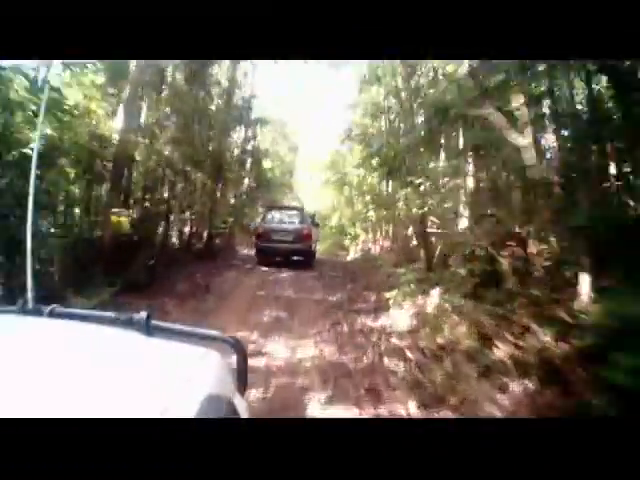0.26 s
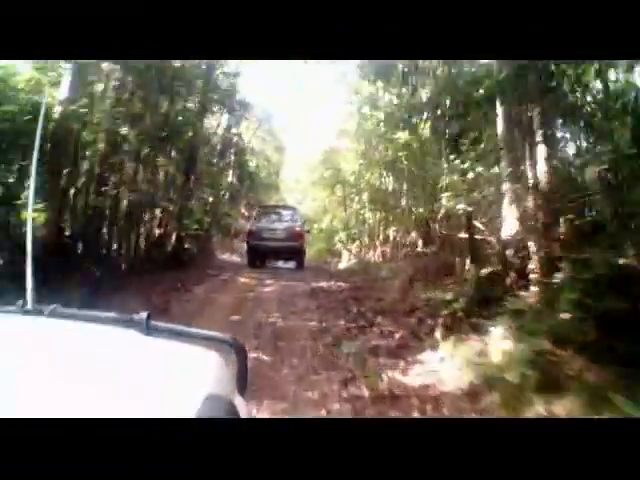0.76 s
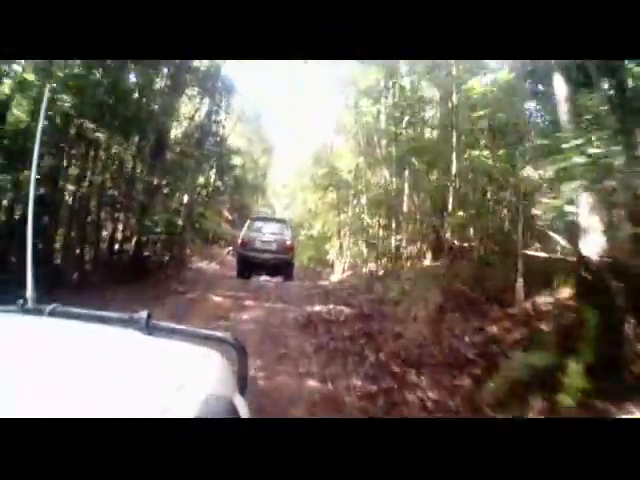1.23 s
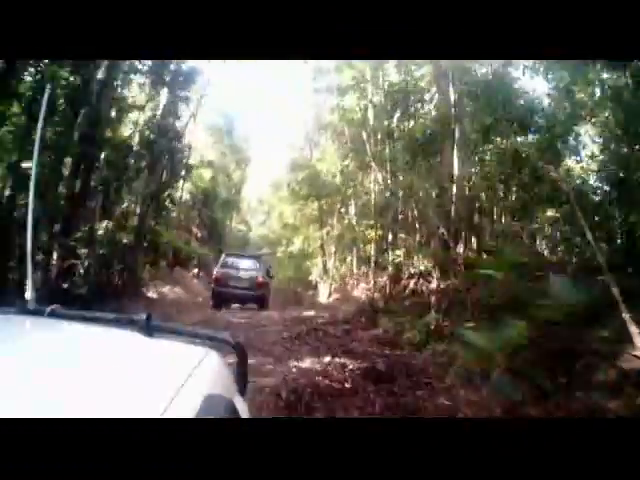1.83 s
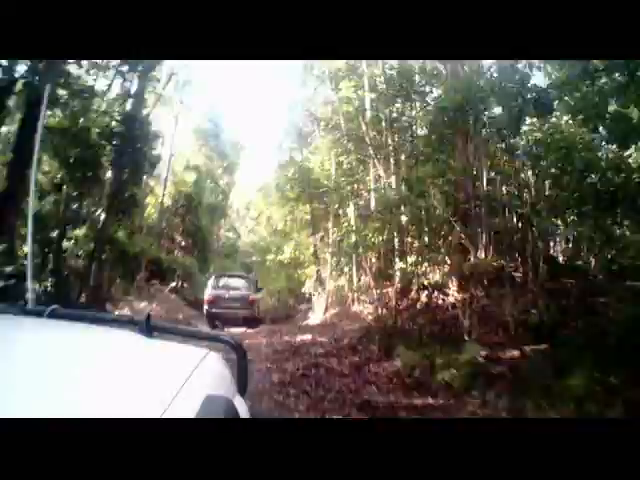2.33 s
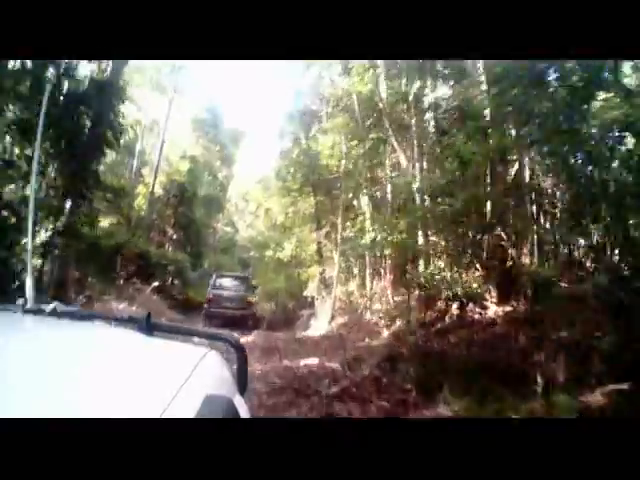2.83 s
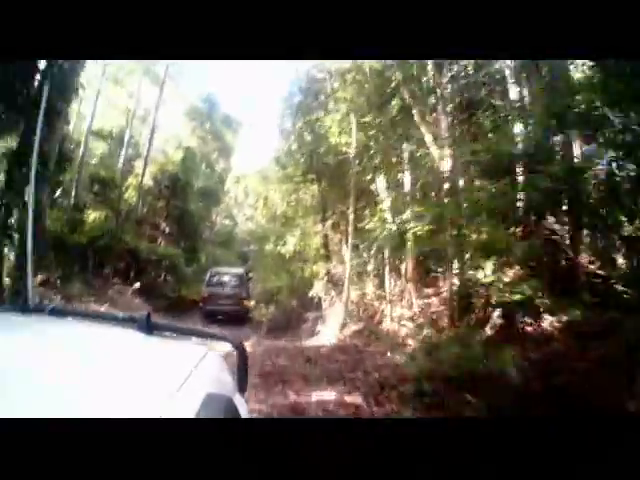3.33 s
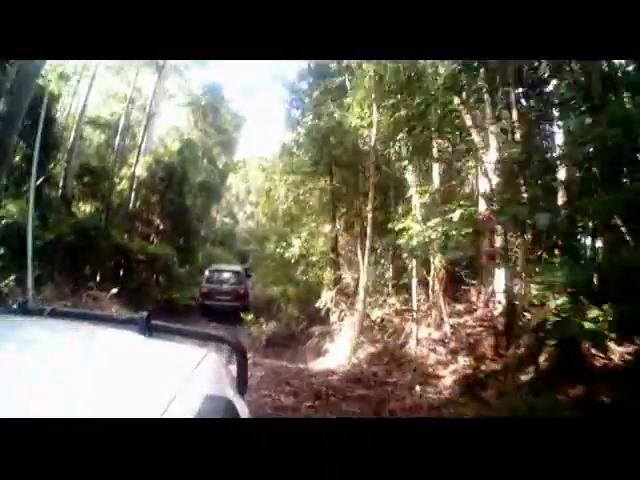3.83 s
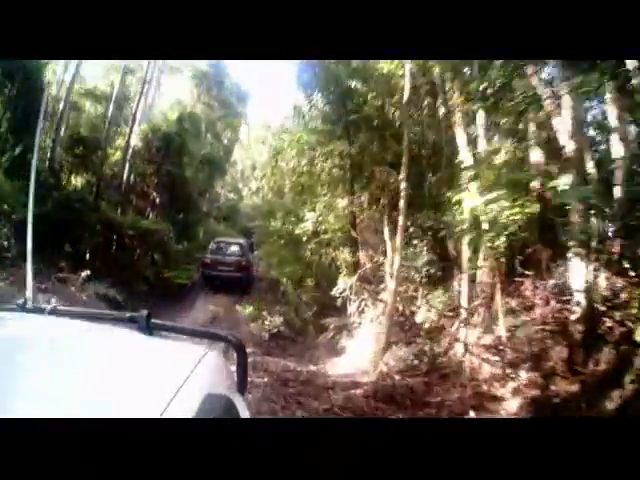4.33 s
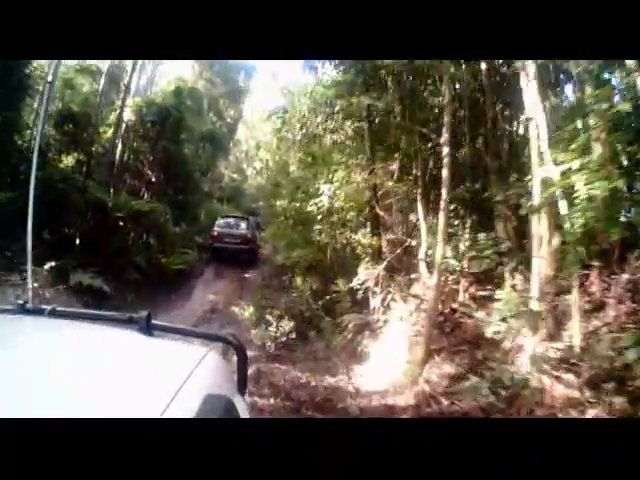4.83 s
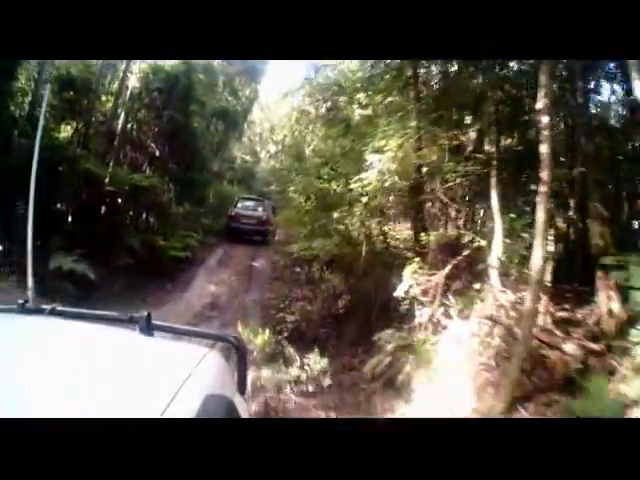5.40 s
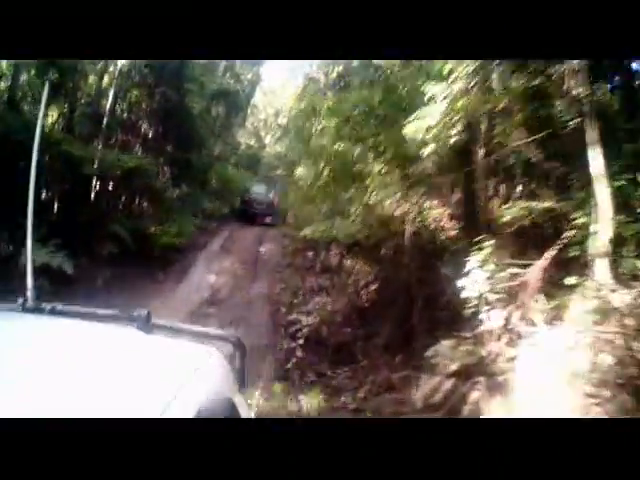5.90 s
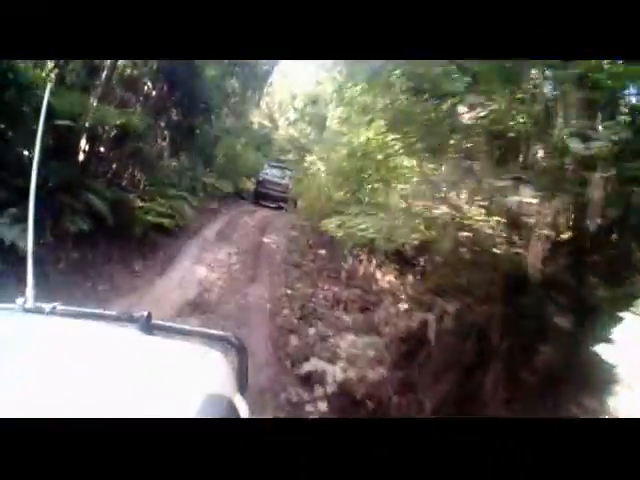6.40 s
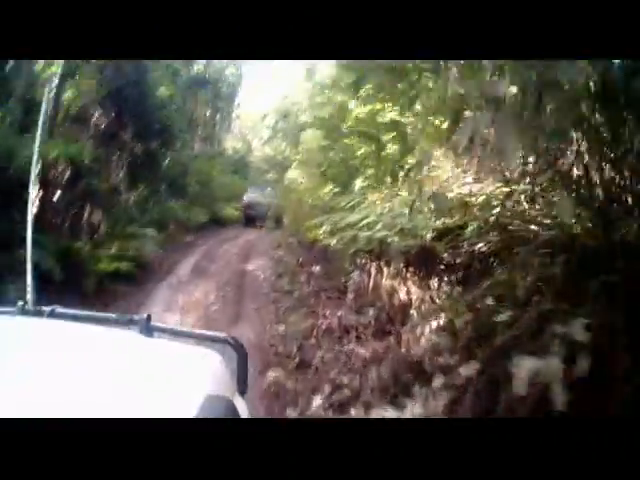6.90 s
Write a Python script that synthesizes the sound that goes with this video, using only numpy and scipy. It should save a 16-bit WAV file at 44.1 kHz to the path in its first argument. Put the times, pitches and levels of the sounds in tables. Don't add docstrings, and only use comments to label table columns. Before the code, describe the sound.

Everything is close and boxy, carried through the mount of a small camera on a four-wheel drive. A deep, uneven rumble lurches over ruts throughout, strongest at the start, beneath a gritty midrange buzz that throbs with the engine. The engine drone falls in pitch from 0 to about 2.3 s, stays low with small changes, eases off in strength around 4.2 to 5 s, then pulls harder and climbs from 5.3 to 6.3 s, with a faint gear whine near 5.9. Tiny twig snaps come at 2.8 s; stones and twigs knock in a cluster from 3.5 to 3.8 and again from 4.1 to 4.6. At 5.16 to 5.23 a hard, brittle double jolt rattles and rings briefly. Single knocks follow, one at 6.2. From 6.65 to the end near 7.15, about nine evenly spaced ratchet clacks thud. Dull tyre hiss, fine injector fizz and faint steady electronic ticking lie behind.

```python
import sys
import numpy as np
from scipy import signal
from scipy.fft import rfft, irfft, next_fast_len
from scipy.io import wavfile
from scipy.ndimage import uniform_filter1d, map_coordinates

SR = 44100
rng = np.random.default_rng(int(sys.argv[2]) if len(sys.argv) > 2 else 0)


def amplitude_ratio(level_db):
    exponent = np.asarray(level_db, float) / 20
    return 10 ** exponent


def transcribe(signal):
    frames = np.atleast_2d(signal).T
    limited = np.clip(frames, -1, 1)
    pcm = np.round(limited * 32767).astype(np.int16)
    wavfile.write(sys.argv[1], SR, pcm)


N = 315315

# t/s, level/dB
ROUGHNESS = [(0, -33.5), (1, -39.5), (1.9, -42.5), (2.3, -39), (4.5, -40), (5.4, -42.5), (5.7, -46.5),
             (6.55, -45), (6.85, -35.5), (7.15, -38)]
# t/s, level/dB
RUTS = [(.02, -25.5), (.21, -30), (.49, -31), (.73, -29.5), (1.19, -33), (1.45, -36), (1.76, -34.5),
        (2.08, -28.5), (2.23, -31), (2.4, -34), (2.84, -30.5), (3.05, -32), (3.25, -34.5), (3.76, -32),
        (4.05, -33), (4.24, -34), (4.57, -33), (5.29, -34), (5.5, -39.5), (6.7, -35.5), (7.02, -27)]
# t/s, level/dB
LITTER = [(0.0, -58.5), (0.3, -59), (1.29, -60.5), (1.59, -62), (2.61, -63), (4.02, -59.5), (4.26, -58),
          (5.12, -58.5), (5.28, -57.5), (5.81, -58.5), (6.07, -56), (6.39, -57.5), (6.69, -56.5),
          (6.87, -57.5), (7.15, -57)]

# f/Hz, width/Hz, level/dB
SWAY = [(33.8, 9.2, 13.5), (17, 6.7, -19.5), (48, 6.5, -25), (70, 37, -37.5)]
# f/Hz, width/Hz, level/dB
FRAME = [(117.8, 14, -1.5), (137.7, 27, -1.1), (176.7, 27, 1), (206.7, 23, -1.5)]
# f/Hz, width/Hz, level/dB
CLAMP = [(243, 7, 0)]
# f/Hz, width/Hz, level/dB
HOUSING = [(1053.6, 120, -2.5), (1111, 83, 1), (1159, 33, -6.5)]
# f/Hz, width/Hz, level/dB
PANELS = [(304.3, 67, -0.5), (335, 130, -6.5), (416.4, 58, -2), (474, 70, -0.5), (624, 250, -10),
          (791, 82, -3), (891, 110, -2.5)]
# f/Hz, width/Hz, level/dB
CAVITY = [(2712, 280, -3), (4090, 440, -11)]
# f/Hz, width/Hz, level/dB
PAWL = [(419, 360, -1.5), (695, 550, -5), (1130, 290, -2.5), (3860, 580, -4), (1503, 380, 3),
        (2750, 480, -4)]
# f/Hz, width/Hz, level/dB
MOUNT = [(75.6, 14, -53.5), (118, 32, -40.5), (136.7, 16, -37), (179.4, 6.5, -35.5), (239.3, 10, -29.5)]

# t/s, housing peak level/dB, frame level/dB, crack level/dB
KNOCKS = [(2.899, -43, 12.5, -27), (3.5207, -30, -2, -14), (3.543, -30.5, 0.5, -8),
          (3.576, -37.5, 14.5, -6.5), (3.6325, -43, 17, -5.5), (3.7191, -36.5, 7, -13),
          (3.7729, -35.5, 8.5, -7.5), (3.8033, -34, -12, -28), (4.1418, -34, -13.5, -31),
          (4.2417, -40.5, -2, 0.5), (4.5106, -40.5, 10, -19), (4.5522, -54, 13, 4), (4.642, -37.5, 8.5, -5),
          (5.2501, -32.5, 5, -18), (5.361, -34, -9, -7), (5.3995, -33, 3, -16), (6.1855, -30.5, -1.5, -15),
          (6.545, -36, 8.5, -13), (6.6115, -28.5, 1, -9), (6.9267, -42.5, 13, -7), (7.134, -36.5, -1, -2.5)]
# t/s, housing peak level/dB, frame level/dB, crack level/dB
JOLTS = [
    (3.735, -35.5, -6, -7),
    (3.75, -30.5, 3.5, -11.5),
    (5.164, -31.5, -6, 1.5),
    (5.198, -30.5, -8.5, -9.5),
    (5.216, -31, -4, -5.5),
    (5.233, -31, 6, -3.5),
]
# t/s, f/Hz, peak level/dB, t60/s
BUMPS = [(3.74, 129, -18, 0.29), (3.729, 465, -28.5, 0.095), (3.731, 920, -28, 0.092),
         (3.733, 1150, -29.5, 0.079), (3.545, 1850, -46, 0.055), (4.545, 1620, -41.5, 0.053),
         (5.163, 1124, -9, 0.056), (5.1635, 3900, -44, .04), (6, 1180, -23.5, .035),
         (5.164, 1760, -35, 0.064), (5.178, 820, -27, .07), (5.166, 470, -31, .09), (5.217, 560, -27, 0.06),
         (5.2155, 189.3, -16, 0.14), (3.521, 1150, -27, 0.046), (3.543, 1150, -29.5, 0.032),
         (5.2155, 242.6, -20.5, 0.26), (5.214, 127, -29.5, 0.18), (5.216, 319, -22.5, 0.13),
         (5.215, 447, -21.5, 0.088), (5.216, 780, -25.5, 0.091), (5.216, 890, -26, 0.094),
         (5.216, 1101, -15.5, 0.059), (5.222, 2050, -42, 0.088), (6.184, 926, -33, 0.089)]
# t/s, peak level/dB, f/Hz
SNAPS = [
    (2.83, -46, 2680),
    (2.8649, -49, 4300),
    (5.4494, -58, 2830),
]
# t/s, peak level/dB, ring level/dB
RATCHET = [(6.647, -18.5, -19.5), (6.706, -15, -18), (6.764, -15, -21.5), (6.824, -16, -21.5),
           (6.887, -18, -23), (6.949, -21.5, -22), (7.006, -26, -18), (7.072, -20, -25),
           (7.132, -21.5, -29)]

# t/s, firing rate f/Hz
SPEED = [(0, 80), (.3, 79.1), (.75, 75), (1.25, 72.2), (1.55, 69.3), (2, 60.8), (2.35, 59.1), (2.95, 59.9),
         (3.45, 64.4), (4.05, 64.7), (4.7, 62.9), (5.05, 61.3), (5.3, 62.5), (5.7, 68), (6.15, 78),
         (6.3, 79.2), (6.7, 80.4), (7.15, 80.4)]
# t/s, level/dB
ORDER_LEVEL = [(0, -5), (.45, -10.5), (1.3, 1), (2.15, -6), (2.9, 1.5), (3.7, -0.5), (4.2, -18.5), (5, -26),
               (5.2, -1), (5.93, 2), (6.14, -11), (6.185, 5.5), (6.265, -9), (6.3, -1), (6.63, 4.5), (6.79, -3.5),
               (6.92, 5.5), (7.04, -1.5)]
# t/s, mesh f/Hz, level/dB
GEAR = [(0, 455, -62), (.5, 428, -59), (1.3, 390, -65), (2, 346, -66), (2.7, 332, -61), (4, 350, -75),
        (5.75, 359, -61), (5.93, 373, -47), (6.12, 386, -60), (7.15, 420, -70)]

# f/Hz, density level/dB
HISS = [(740, -39.5), (1250, -3), (1390, 4), (1510, -3), (1640, -2.5), (1850, -6.5), (2330, -12.5),
        (2500, -14.5), (3250, -37), (5500, -120)]
# f/Hz, density level/dB
FIZZ = [(1350, -30.5), (2300, -3.5), (2340, -6.5), (2870, -3), (3700, -1.5), (4220, -2.5), (5050, -7.5),
        (5510, -17), (6050, -14), (6910, -20), (8980, -51), (15200, -120)]
# f/Hz, density level/dB
TICK = [(1800, -63), (2600, 3.5), (4200, -3.5), (5500, -4.5), (6800, -22.5), (7500, -52)]
# f/Hz, gain level/dB
BAND = [(6900, 0), (7200, -3.5), (7600, -20.5), (9500, -51.5)]


def road():
    firing_hz = curves(SPEED)[0]
    sway = rocking() * shaken(modes(SWAY), even=.7)
    frame_db = follows(mean_db=-40.5, per_db=.9, swell_db=1.5)
    frame = amplitude_ratio(frame_db) * shaken(modes(FRAME), even=.6)
    clamp_db = follows(mean_db=-41.5, per_db=-.35, swell_db=1.1)
    clamp = amplitude_ratio(clamp_db) * shaken(modes(CLAMP), even=.45)

    throb_db = 2.2 * np.cos(2 * np.pi * np.cumsum(firing_hz) / SR)
    low_db = -2 + .22 * (65 - firing_hz)
    buzz = shaken(modes(HOUSING[1:]), even=.37, grit_db=2.5)
    buzz += amplitude_ratio(low_db) * shaken(modes(HOUSING[:1]), even=.4, grit_db=2.5)
    buzz_db = follows(mean_db=-48, per_db=.69, swell_db=.34) - 2.2 + throb_db
    return sway + frame + clamp + amplitude_ratio(buzz_db) * buzz


def rocking():
    t = np.arange(0, N / SR + .01, .005)
    half_width_s = .042
    lurches = sum(amplitude_ratio(db) * np.exp(-.5 * ((t - s) / half_width_s) ** 2) for s, db in RUTS)
    general = amplitude_ratio(curves(ROUGHNESS)[0] - 1.0 + 3.5 * wobble(18))
    return np.hypot(general, np.interp(np.arange(N) / SR, t, lurches))


def knocks():
    s, db, frame_db, crack_db = np.transpose(KNOCKS + JOLTS)
    contact_ms = np.repeat([3.3, 5.6], [len(KNOCKS), len(JOLTS)])
    s = s - .0015
    housing = blows(s, db + .44, 1.3 * contact_ms, push=.46)
    frame = blows(s - .002, db + frame_db - 3.0, contact_ms, push=.47)
    panels = blows(s, db + .5 * crack_db + 4.5, 3 * contact_ms, push=.7)
    crack = blows(s, db + crack_db + 1.5, 4 * contact_ms, push=.16)
    cavity = blows(s, db + crack_db - 16, 2.2 * contact_ms, push=.29)
    out = coloured(housing, modes(HOUSING)) + coloured(frame, modes(FRAME + CLAMP))
    out += coloured(panels, modes(PANELS)) + coloured(crack, spectrum(HISS))
    return out + coloured(cavity, modes(CAVITY))


def snaps():
    twigs = rings([(s, hz, db, .02) for s, db, hz in SNAPS], rise_s=.001, rough=.93)
    return twigs + rings(BUMPS, rise_s=.0042, rough=.09)


def ratchet():
    s, db, ring_db = np.transpose(RATCHET)
    thuds = [(at + .0008, 212, level + 1.2, .045) for at, level in zip(s, db)]
    pings = [(at + .00091, 2030, level + .9, .028) for at, level in zip(s, db + ring_db)]
    booms = [(at, 158.5, level - 9.5, .18) for at, level in zip(s, db)]
    out = rings(thuds, rise_s=.0007, rough=.05)
    out += rings(pings, rise_s=.0018, rough=.2)
    out += rings(booms, rise_s=.0037, rough=.3)
    body = blows(s + .0015, db - 7.0, 2.7 + 0 * s, push=.61)
    teeth = blows(s + .00145, db + ring_db - 1.5, 5.9 + 0 * s, push=.37)
    return out + coloured(body, modes(PAWL[:3])) + coloured(teeth, modes(PAWL[3:]))


def engine():
    firing_hz, order_db = curves(SPEED)[0], curves(ORDER_LEVEL)[0]
    turn = 2 * np.pi * np.cumsum(firing_hz) / SR
    gains = [amplitude_ratio(order_db) * modes(MOUNT)(order * firing_hz) for order in (1, 2, 3)]
    gains.append(amplitude_ratio(-59))
    tones = np.zeros(N)
    for order, gain in enumerate(gains, start=1):
        tones += gain * amplitude_ratio(wobble(12)) * np.sin(order * turn + .25 * wobble(8))
    whine = amplitude_ratio(-73.5) * (wobble(70) * np.sin(35.3 * turn) + wobble(70) * np.cos(35.3 * turn))
    mesh_hz, mesh_db = curves(GEAR)
    mesh_phase = 2 * np.pi * np.cumsum(mesh_hz) / SR + .9 * wobble(10)
    mesh = amplitude_ratio(mesh_db + 3 * wobble(10)) * np.sin(mesh_phase)
    return np.sqrt(2) * (tones + mesh) + whine


def air():
    panels_db = follows(mean_db=-50.5, per_db=.92, swell_db=.93)
    panels = amplitude_ratio(panels_db) * shaken(modes(PANELS), even=.01, grit_db=1.5)
    tyres_db = follows(mean_db=-60, per_db=.9, swell_db=.44)
    tyres = amplitude_ratio(tyres_db) * shaken(spectrum(HISS), even=.01, grit_db=1.5)
    whistle_db = follows(mean_db=-69, per_db=2.4, swell_db=1)
    whistle = amplitude_ratio(whistle_db) * shaken(modes(CAVITY), even=.01, grit_db=2.0)
    injectors_db = follows(mean_db=-68, per_db=.36, swell_db=.6)
    injectors = amplitude_ratio(injectors_db) * shaken(spectrum(FIZZ), even=.01, grit_db=.5)
    return panels + tyres + whistle + injectors


def electronics():
    times = np.arange(.0022, N / SR - .01, 1 / 57.615)
    pulses = blows(times, rng.normal(0, 2.5, len(times)), .4 + 0 * times, push=1.6)
    return amplitude_ratio(-75) * unit(coloured(pulses, spectrum(TICK)))


def follows(mean_db, per_db, swell_db):
    litter_db = curves(LITTER)[0]
    return mean_db + per_db * (litter_db - litter_db.mean()) + swell_db * wobble(7)


def shaken(gain, even, grit_db=0.):
    drive = rng.standard_normal(N) * amplitude_ratio(grit_db * wobble(60))
    z = signal.hilbert(coloured(drive, gain), next_fast_len(N))[:N]
    return unit(np.real(z / (np.abs(z) + 1e-9) ** np.clip(even, 0, .9)))


def blows(times, db, contact_ms, push):
    t = np.arange(SR // 16) / SR
    u = 1000 * t / np.clip(contact_ms, .2, 15)[:, None]
    bursts = np.exp(-u) * rng.standard_normal(u.shape)
    bursts[:, 0] = push * np.linalg.norm(bursts, axis=1)
    bursts *= (amplitude_ratio(db) / np.linalg.norm(bursts, axis=1))[:, None]
    at = np.round(times * SR).astype(int)[:, None] + np.arange(len(t))
    return np.bincount(at.ravel(), bursts.ravel(), N + SR)[:N]


def rings(rows, rise_s, rough):
    out, t = np.zeros(N + SR), np.arange(SR // 4) / SR
    for s, hz, db, t60 in rows:
        walk = uniform_filter1d(np.cumsum(rng.standard_normal(len(t))), size=24)
        tone = np.sin(2 * np.pi * hz * t + rough * walk * np.sqrt(hz / SR))
        out[round(s * SR):][:len(t)] += amplitude_ratio(db - 60 * t / t60) * tone * (1 - np.exp(-t / rise_s))
    return out[:N]


def coloured(x, gain):
    size = 2 ** 15
    cepstrum = irfft(np.log(gain(np.fft.rfftfreq(size, 1 / SR)) + 1e-6), size)
    cepstrum[1:size // 2] *= 2
    cepstrum[size // 2 + 1:] = 0
    answer = irfft(np.exp(rfft(cepstrum)), size)
    return signal.oaconvolve(x, answer / np.abs(answer).max())[:N]


def modes(rows):
    def one(hz, centre, width):
        return (hz * width) ** 2 / ((centre * centre - hz * hz) ** 2 + (hz * width) ** 2)
    return lambda hz: np.sqrt(sum((amplitude_ratio(db) * one(hz, c, w)) ** 2 for c, w, db in rows))


def spectrum(points):
    f, db = np.transpose(points)
    return lambda hz: amplitude_ratio(np.interp(np.log(hz + 1), np.log(f), db))


def curves(rows):
    s, *cols = np.transpose(rows)
    return [np.interp(np.arange(N) / SR, s, c) for c in cols]


def wobble(rate):
    knots = rng.standard_normal(int(N * rate / SR) + 4)
    return map_coordinates(knots, [np.arange(N) * rate / SR])


def unit(x):
    return x / np.sqrt(np.mean(x ** 2) + 1e-20)


def scene():
    return (road() + knocks() + snaps() + ratchet() + engine() + air())[None]


def low_pass(x):
    return signal.sosfilt(signal.butter(12, 11370, fs=SR, output="sos"), x)


def record(dry):
    size = next_fast_len(N + SR // 4)
    band = spectrum(BAND)(np.fft.rfftfreq(size, 1 / SR))
    heard = irfft(rfft(dry + electronics(), size) * band, size)[:, :N]
    bass_slope = np.gradient(uniform_filter1d(heard, size=60), axis=1)
    mirror_hz = SR / 4
    mirror = amplitude_ratio(-32) * bass_slope * np.cos(2 * np.pi * mirror_hz * np.arange(N) / SR)
    return low_pass(heard + mirror)


dry = scene()
out = record(dry)
transcribe(out)
```